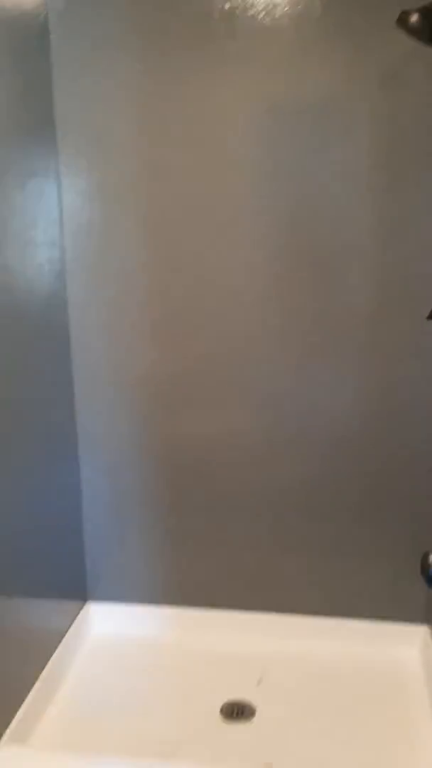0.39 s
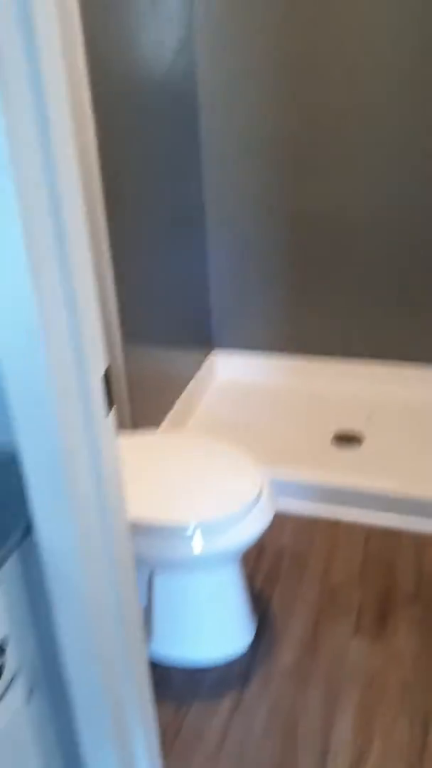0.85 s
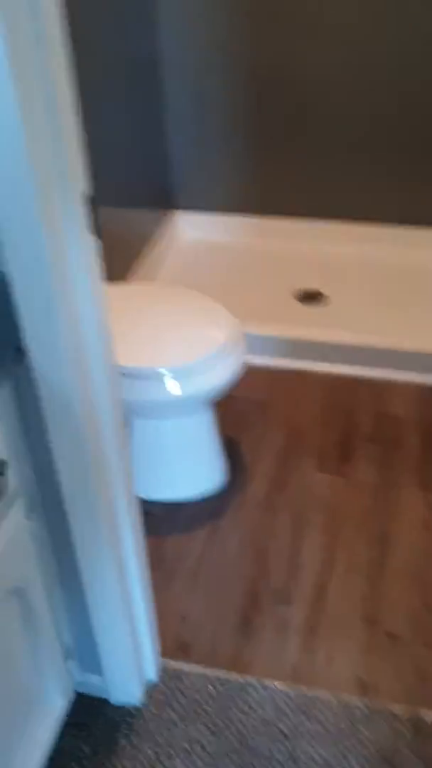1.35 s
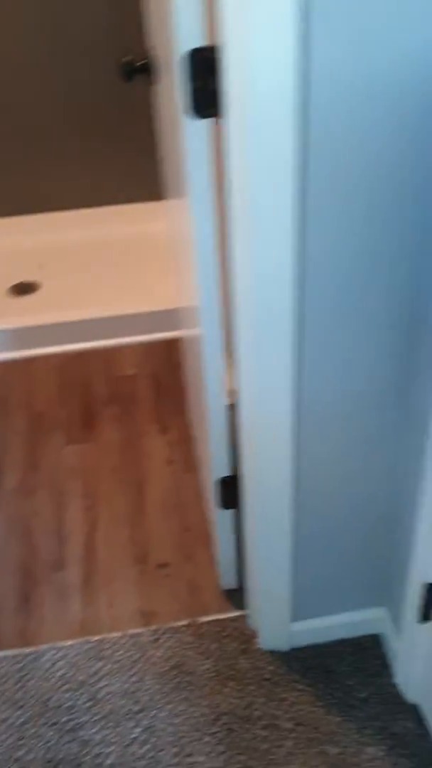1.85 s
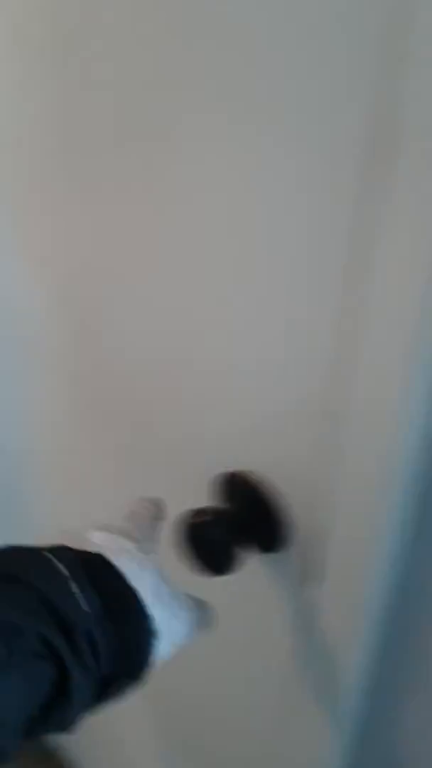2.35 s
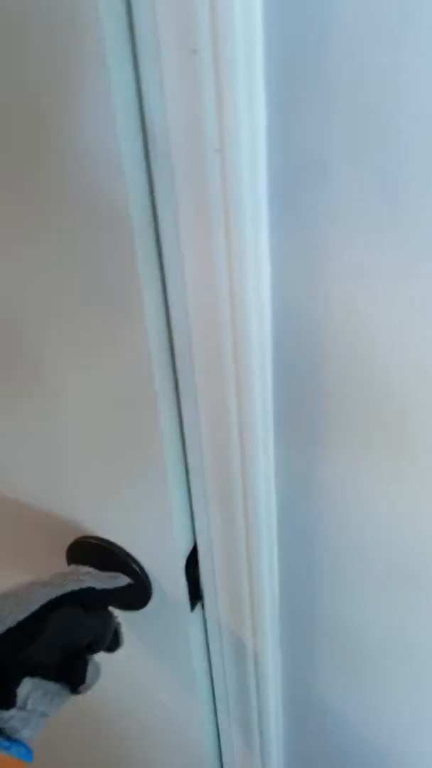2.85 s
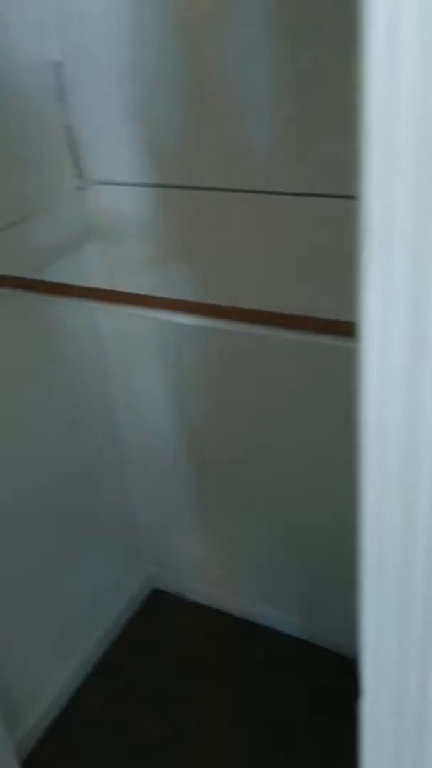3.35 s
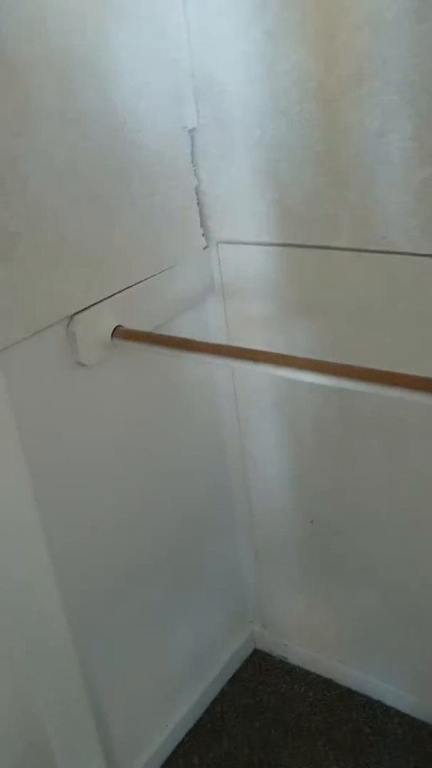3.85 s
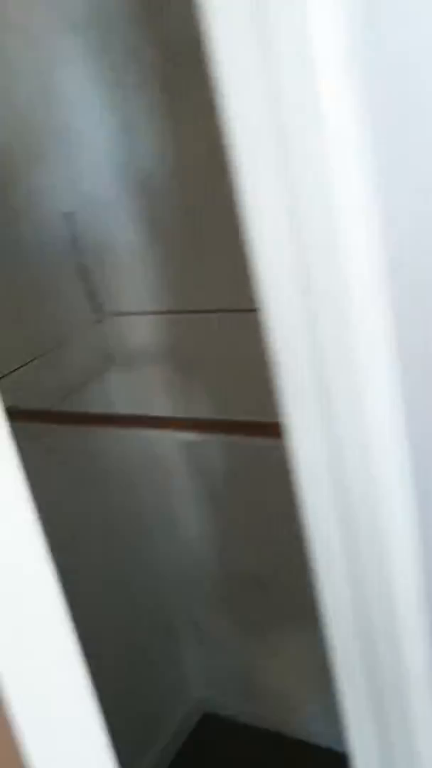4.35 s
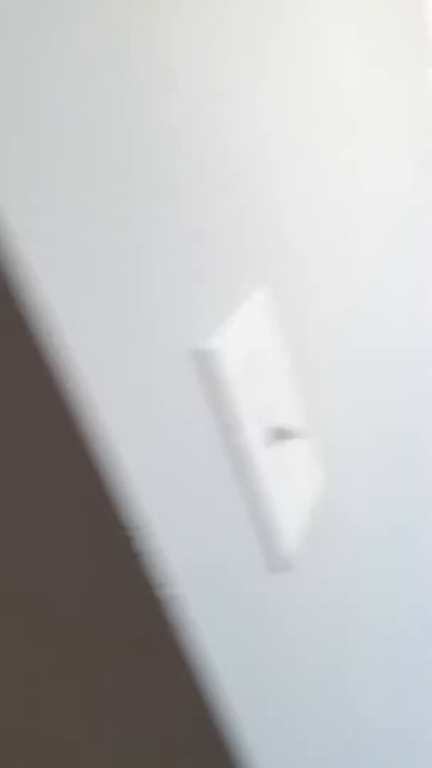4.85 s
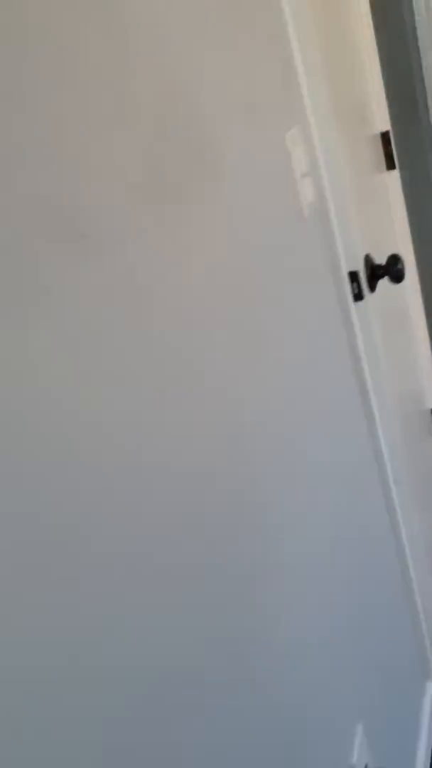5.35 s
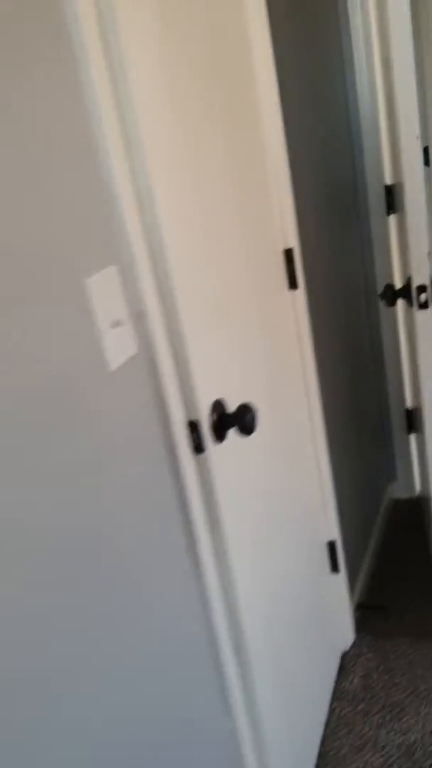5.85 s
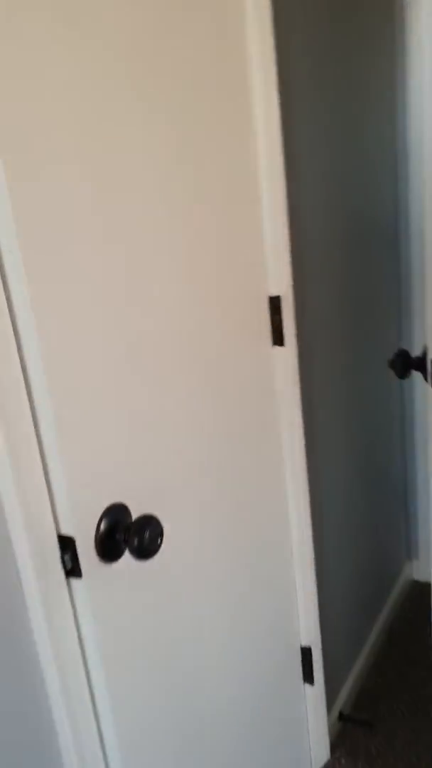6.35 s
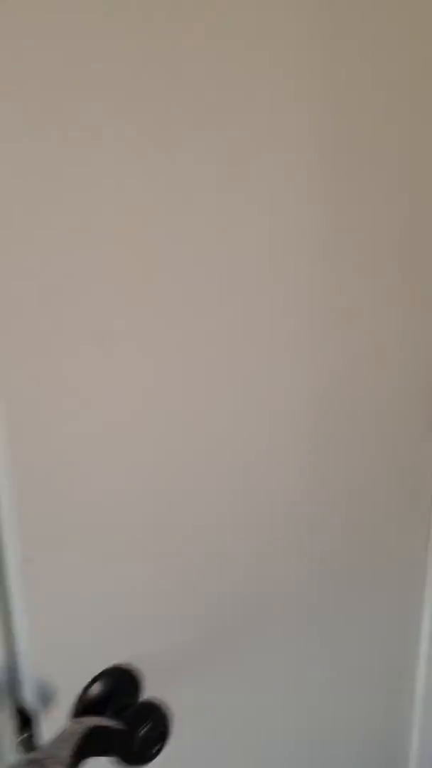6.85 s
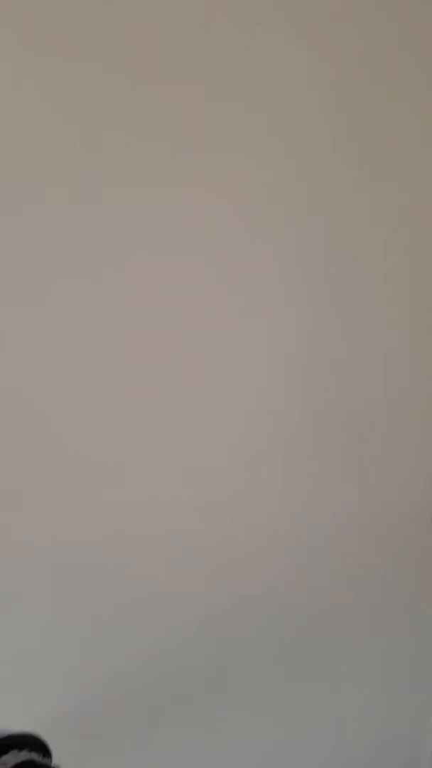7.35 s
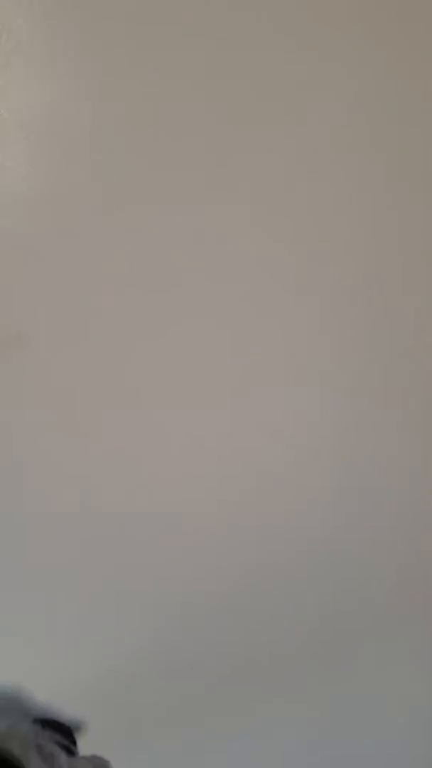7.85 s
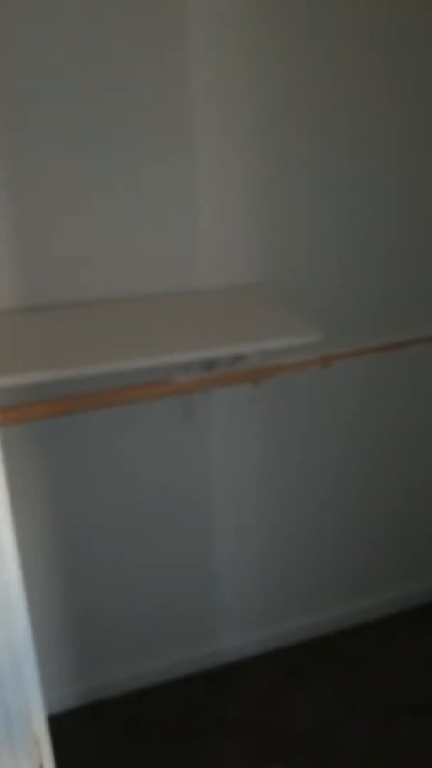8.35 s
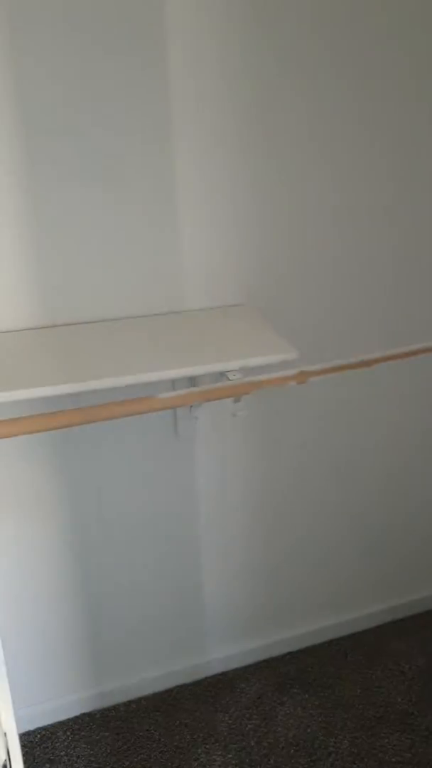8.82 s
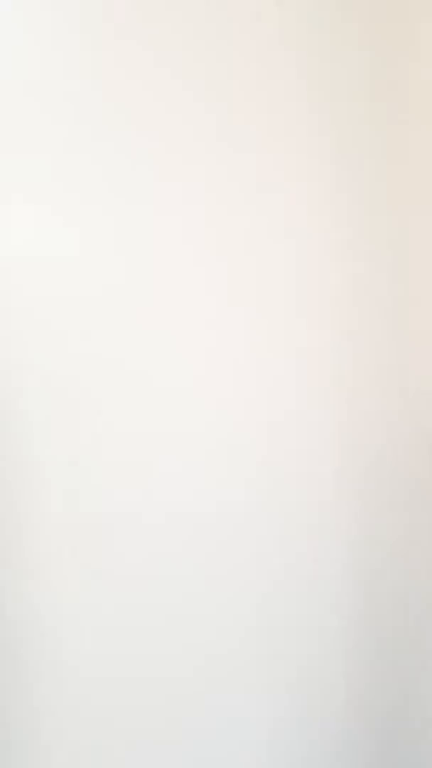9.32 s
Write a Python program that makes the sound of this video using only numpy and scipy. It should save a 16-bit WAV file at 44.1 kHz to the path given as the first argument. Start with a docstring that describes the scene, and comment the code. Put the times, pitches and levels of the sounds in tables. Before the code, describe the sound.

A jacket rustles close by, then door latches click and hollow doors thud and knock in an empty, carpeted house with bare walls.

```python
"""First a stiff jacket rustles close to a hand-held phone, over soft bumps and a faint hush; then
closet doors are opened and shut in an empty, carpeted house. Latches and knobs click (rattling
noise through metal bands), hollow leaves thud (struck modes) and knock (noise bands), bumps sag in
pitch, and hinges sing faintly (blurred tones). Bare walls add a short tail, and each blow stirs
a deep rumble."""
import sys
import numpy as np
from scipy import signal
from scipy.fft import rfft, irfft, next_fast_len
from scipy.io import wavfile
from scipy.ndimage import uniform_filter1d

SR = 44100
rng = np.random.default_rng(int(sys.argv[2]) if len(sys.argv) > 2 else 0)


def convert_level_to_amplitude(level_db):
    """Map a level in decibels to its linear amplitude factor."""
    exponent = np.asarray(level_db, float) / 20
    return 10 ** exponent


def wrap_up_sound(samples):
    """Save the sound to the file named by the first command line argument, as 16-bit audio."""
    columns = np.atleast_2d(samples).T
    # keep every value between -1 and 1, then stretch to whole-number steps
    tamed = np.clip(columns, -1, 1)
    steps = np.round(tamed * 32767).astype(np.int16)
    wavfile.write(sys.argv[1], SR, steps)


N = 417141
T = np.arange(N) / SR


def on_log(table, hz):
    """Read a (f/Hz, value) table on a log-frequency axis."""
    f, v = np.transpose(table)
    return np.interp(np.log(np.maximum(hz, 1)), np.log(f), v)


def unit(x):
    """Scale to rms 1."""
    return x / np.sqrt(np.mean(x ** 2))


def peak(x):
    """Scale to peak 1."""
    return x / np.abs(x).max()


def shaped(x, gain):
    """Filter by a gain given as a function of frequency."""
    n = next_fast_len(x.shape[-1])
    return irfft(rfft(x, n) * gain(np.arange(n // 2 + 1) * SR / n), n)[..., :x.shape[-1]]


def bell(hz, centre_hz, octaves):
    """Smooth band around a centre."""
    return np.exp(-.5 * (np.log2(np.maximum(hz, 1) / centre_hz) / octaves) ** 2)


def walk(rate):
    """Slow chance, spread 1, with a new target rate times a second."""
    k = int(SR / rate)
    steps = np.repeat(rng.standard_normal(N // k + 1), k)
    return unit(uniform_filter1d(uniform_filter1d(steps, k), k)[:N])


def swell(t0, t1, rise_db_s, fall_db_s):
    """Level in dB that climbs to 0 at t0, holds to t1 and falls away."""
    return -rise_db_s * np.maximum(t0 - T, 0) - fall_db_s * np.maximum(T - t1, 0)


def add(out, s, x):
    """Mix x in from time s."""
    i = int(s * SR)
    out[..., i:i + x.shape[-1]] += x[..., :N - i]


def sides(x, pan_db):
    """Spread one signal over both channels; pan_db is left minus right."""
    return x * convert_level_to_amplitude(np.array([pan_db, -pan_db]).reshape(2, -1) / 2)


# Latch, knob and strike plate, levels before walls and ports:
# t/s, peak level of the metal/dB, bright edge level/dB, wooden low part level/dB, ring f/Hz
LATCH_CLICKS = [(2.056, -37.5, -49, -60, 3070), (2.4955, -37, -41, -60, 4100),
                (2.5046, -10.5, -27, -14, 4230), (2.511, -14, -27.5, -34, 2380),
                (2.6638, -23.5, -37, -39, 2260), (2.7327, -6, -24, -35, 5500),
                (2.7415, -14, -25, -36.5, 3270), (2.8067, -9.5, -35, -41, 3400),
                (2.8135, -15.5, -27, -30.5, 2220), (3.1354, -40.5, -60, -59, 3080),
                (3.1555, -51, -42, -61, 3500), (3.2475, -29.5, -59, -49, 3440),
                (3.265, -23.5, -49, -51, 4280), (3.2915, -26, -61.5, -54, 5240),
                (4.551, -44, -67, -43.5, 1287), (4.7593, -21.5, -41.5, -35.5, 5050),
                (4.7665, -23.5, -50, -35, 2120), (4.9338, -16.5, -54, -11, 1500),
                (4.9412, -8.5, -25.5, -31.5, 2400), (4.9478, -9.5, -26, -34, 5500),
                (5.955, -48, -80, -82, 3080), (6.003, -45, -81, -81.5, 3190),
                (6.762, -67.5, -80.5, -58.5, 2010), (6.914, -39, -57, -64, 5500),
                (6.98, -49.5, -60, -62, 5000), (7.0943, -40.5, -50, -57.5, 2900),
                (7.1687, -42.5, -64, -59, 3260), (7.207, -45.5, -78, -70, 3180),
                (7.2783, -23, -46, -36.5, 3140), (7.3157, -29.5, -42, -34, 3330),
                (7.3601, -33, -38, -54, 2200), (7.3964, -31, -44, -62, 3280),
                (7.413, -30.5, -35.5, -61, 3500), (7.4245, -32.5, -34, -59, 4580),
                (7.5447, -39, -51, -55, 3630), (7.5528, -57, -67, -45, 1700),
                (7.7024, -28.5, -35.5, -41.5, 1800), (7.9089, -34.5, -63, -39, 3740),
                (7.9742, -15, -31, -39, 2600), (7.981, -25, -30.5, -38, 2500),
                (8.0137, -22, -31, -21, 5300), (8.019, -17, -61, -25.5, 2340), (8.757, -47, -69, -40, 1710)]
# Glove or foot scuffing, slow to start: columns as for the clicks
SCUFFS = [(1.211, -46, -55, -56, 2600), (1.232, -42.5, -53, -61.5, 3080), (6.235, -52, -75, -57, 1500),
          (2.706, -33.5, -42.5, -48, 5970), (3.157, -39, -55, -51.5, 2050),
          (3.268, -34.5, -65, -58.5, 3450), (3.393, -38, -45, -48.5, 3833),
          (4.821, -30.5, -28.5, -38.5, 4470), (7.942, -35.5, -37, -57, 4900),
          (6.1994, -53, -75.5, -48, 1930), (6.801, -42.5, -66, -44.5, 1900)]
# Resonances of the latch metal: f/Hz, width/Hz, level/dB
METAL_MODES = [(1900, 1000, 1.5), (2600, 590, -10.5), (4300, 880, -2), (7340, 1100, 2)]
# Harder contacts rattle longer; the more wood takes the blow, the sooner it stops (both in doublings)
LONGER_PER_DB, SHORTER_PER_WOOD_DB = 0.0556, 0.1957
LATCH_HZ, RING_PULL = 4200, 0.55  # the broad clack leans from the latch's own centre towards the ring pitch
RATTLE_TOP_HZ = 3500
SNAP_DB, SNAP_MS = -7, 0.5  # the first instant of a hard contact, against its peak


def contacts(table, rise_s, tick, rattle_ms):
    """Each contact is a tick and a rattle that ring metal, its bright edge and the wood around it."""
    out, t = np.zeros((2, N)), np.arange(8192) / SR
    for s, db, top_db, wood_db, ring_hz in table:
        extra_wood_db = np.clip(wood_db - db + 12.0, -4, 9)
        doublings = LONGER_PER_DB * (db + 25.5) - SHORTER_PER_WOOD_DB * extra_wood_db
        ms = max(rattle_ms * 2 ** doublings, 1)
        clack_hz = LATCH_HZ * (ring_hz / LATCH_HZ) ** RING_PULL

        def metal(hz):
            modes = sum(convert_level_to_amplitude(d) / (1 + (2 * (hz - f) / w) ** 2) for f, w, d in METAL_MODES)
            return bell(hz, clack_hz, 1.0) * (0.14 + modes + 1.1 * bell(hz, ring_hz, 0.24))

        # parts of the latch lie apart, so the ports differ
        shared, left, right = rng.standard_normal((3, len(t)))
        noise = shared + np.array([left, right])
        rise, rattle = np.minimum(t / rise_s, 1), np.exp(-t * 1000 / ms)

        # the treble dies with the tick
        bright = shaped(noise, metal) * (tick * np.exp(-t / 0.009) + 0.2 * rattle ** 2)
        dull = shaped(noise, lambda hz: metal(hz) / np.hypot(1, hz / RATTLE_TOP_HZ)) * rattle
        x = convert_level_to_amplitude(db) * peak((bright + dull) * rise)

        snap = shaped(noise, lambda hz: bell(hz, ring_hz, 1.5)) * np.exp(-t * 1000 / SNAP_MS)
        x += convert_level_to_amplitude(db + SNAP_DB) * (tick > 0) * peak(snap)

        edge = unit(shaped(noise, lambda hz: bell(hz, 14000, 0.7)))
        fall = (rattle + tick * np.exp(-t / 0.0026)) * rise
        x += convert_level_to_amplitude(top_db) * edge * fall * rattle ** 0.35

        # wood rings on longer
        wood = unit(shaped(noise, lambda hz: bell(hz, 540, 1.0) + 0.34 * bell(hz, 800, 0.04)))
        x += convert_level_to_amplitude(wood_db) * wood * rattle ** 0.39 * rise
        add(out, s, x)
    return out


# Door leaf struck: t/s, peak level/dB before walls and ports, contact length/ms
THUDS = [(2.507, -14.5, 0.68), (2.546, -17, 0.84), (2.716, -22.5, 2.8), (2.812, -24.5, 1.1),
         (2.985, -33, 0.37), (3.263, -38.5, 0.62), (4.767, -30, 0.85), (4.933, -11, 2.6), (4.945, -12, 1.7),
         (4.959, -12.5, 2.0), (7.127, -44.5, 0.47), (7.285, -26, 0.32), (7.322, -23.5, 3.4),
         (7.367, -22, 3.9), (7.554, -33.5, 0.59), (7.66, -34, 0.68), (7.907, -28, 3.8), (7.965, -15.5, 2.9),
         (8.019, -12.5, 1.65), (8.07, -24.5, 2.1), (8.753, -44, 0.73)]
# Modes of the hollow leaf, before scatter: f/Hz, level/dB, t60/s before LEAF_DAMPING
LEAF_MODES = [(152, -4, 0.48), (222.3, -1, 0.56), (268, -3.5, 0.44), (314.6, -1.5, 0.22), (376, -9, 0.79),
              (433, -7, 0.66), (597, -17.5, 0.6), (596, -31.5, 0.46), (780, -22, 0.4), (980, -20.5, 0.27)]
LEAF_DAMPING = 0.77  # share of the listed t60
FRAME_DB, FRAME_MS = -7.5, 23  # the frame soaks up most of a blow at once; the rest rings on at this level


def thuds():
    """A half-sine push and its chatter in the frame ring the leaf; skins and frame split each mode."""
    out, t = np.zeros(N), np.arange(SR // 2) / SR
    modes = LEAF_MODES * 8
    for s, db, ms in THUDS:
        ring = 0
        for (f, d, t60), (a, b) in zip(modes, rng.standard_normal((len(modes), 2))):
            tone = np.sin(2 * np.pi * f * np.exp(.06 * b) * t)
            ring = ring + convert_level_to_amplitude(d + 2.0 * a) * tone * 1000 ** (-t / (LEAF_DAMPING * t60))
        ring = ring * (convert_level_to_amplitude(FRAME_DB) + np.exp(-t * 1000 / FRAME_MS))
        chatter = 0.053 * rng.standard_normal(4096) * np.exp(-t[:4096] / 0.05)
        chatter[0] = 1  # the blow itself
        half_sine = np.sin(np.linspace(0, np.pi, max(int(ms * SR / 1000), 3)))
        push = np.convolve(chatter, half_sine)
        add(out, s, convert_level_to_amplitude(db) * peak(signal.fftconvolve(ring, push)))
    return sides(out, 0)


# Knob and bolt knocking the hollow skin: t/s, level/dB before rise and decay, f/Hz, decay/ms
KNOCKS = [(2.506, -28, 735, 39), (2.72, -48, 600, 16), (4.7585, -29, 820, 28), (4.826, -48, 800, 22),
          (4.549, -49, 1500, 4.6), (4.937, -19, 620, 17), (4.949, -33.5, 2000, 83), (6.81, -53, 900, 32),
          (7.279, -38, 610, 15), (7.5525, -39, 610, 24), (7.625, -51, 733, 40), (7.888, -43.5, 784, 33),
          (8.015, -35.5, 530, 70), (8.758, -50, 1454, 44), (3.55, -64, 300, 220), (6.2, -59.5, 700, 54),
          (8.045, -33, 394, 77)]


def knocks():
    """Many close skin modes ring together as a rough band."""
    out, t_ms = np.zeros((2, N)), np.arange(SR // 4) / SR * 1000
    for s, db, hz, ms in KNOCKS:
        shared, left, right = rng.standard_normal((3, len(t_ms)))
        noise = shared + 0.94 * np.array([left, right])
        ring = unit(shaped(noise, lambda f: bell(f, hz, 0.29)))
        rise = np.minimum(t_ms / 1.7, 1)
        add(out, s, convert_level_to_amplitude(db) * ring * rise * np.exp(-t_ms / ms))
    return out


# Soft bumps in leaf, floor and hand: t/s, peak level/dB before walls and ports, starting f/Hz
BUMPS = [(0.06, -53, 89), (0.405, -49, 151), (1.955, -46, 62.84), (2.005, -43, 67), (2.053, -45, 58.5),
         (2.747, -31, 45.73), (2.979, -40.5, 41.03), (3.639, -54, 59), (3.828, -44.5, 73.2),
         (3.867, -41.5, 52.65), (3.97, -43.5, 45.5), (4.792, -32.5, 56), (4.897, -32.5, 57.75),
         (5.033, -31, 55.9), (6.231, -46.5, 129), (6.275, -49.5, 96), (6.808, -40.5, 73.7),
         (6.852, -34.5, 52.5), (6.933, -36.5, 55.45), (7.071, -35.5, 65.3), (7.17, -43, 71),
         (7.361, -21, 81), (7.376, -23, 74.3), (7.447, -34.5, 62.1), (7.958, -10.5, 87.3),
         (7.989, -11, 75.3), (8.059, -9.5, 84.6), (8.129, -15.5, 81), (8.199, -24.5, 64.5),
         (8.269, -30.5, 63.7), (8.337, -28, 56.1), (8.486, -26.5, 103), (8.583, -25, 75.5),
         (8.628, -24, 60.9), (8.668, -26, 100.8), (8.752, -24, 70.5), (8.86, -34.5, 55.6),
         (8.926, -34, 69.9), (9.007, -35.5, 66.3), (9.297, -36, 48.6)]


def bumps():
    """A few soft, lopsided cycles that sag in pitch."""
    out, t = np.zeros(N), np.arange(SR // 2) / SR
    for s, db, hz in BUMPS:
        cycles = hz * t * (1 - 0.13 * t)
        x = np.sin(2 * np.pi * cycles) + 0.16 * np.sin(2 * np.pi * 2.3 * cycles)
        x *= (1 - np.exp(-t / 0.0031)) * np.exp(-hz * t / 1.38)
        add(out, s, convert_level_to_amplitude(db) * peak(x))
    return sides(out, 0)


# Decay of the bare-walled room: f/Hz, t60/s
ROOM_DECAY = [(60, 1), (150, 0.29), (400, 0.44), (1000, 0.56), (3000, 0.36), (8000, 0.43), (14000, 0.09)]
ROOM_DB, ROOM_LIKENESS_HZ = -7.5, 330  # echo energy against the direct sound; ports alike below this


def room(x):
    """Dense echoes fade by band, bass alike at both ports; the phone moves, so four patterns take turns."""
    t, out, places = np.arange(SR) / SR, 0, 4
    place = (T / .07).astype(int) % places
    for k in range(places):
        mid, side = rng.standard_normal((2, SR))
        side = shaped(side, lambda hz: hz / np.hypot(hz, ROOM_LIKENESS_HZ))
        noise, echo = mid + np.outer([1, -1], side), 0
        for f in 45 * 2. ** np.arange(9):
            t60 = on_log(ROOM_DECAY, f)
            band = shaped(noise, lambda hz: bell(hz, f, 0.38))
            echo = echo + band * 1000 ** (-t / t60) / np.sqrt(t60)
        echo *= np.minimum(t / 0.0013, 1)
        echo *= convert_level_to_amplitude(ROOM_DB) / np.sqrt(np.sum(echo ** 2) / 2)
        share = uniform_filter1d(1. * (place == k), 512)  # short crossfades between patterns
        out = out + signal.fftconvolve((x.mean(0) * share)[None], echo, axes=1)[:, :N]
    return out


# Steady sway of the cloth as the holder walks and turns: t/s, level/dB before the band levels,
# crispness/dB (treble against the middle), left minus right/dB (its median is taken off)
SWAY = [(0, -72, 3.5, -5.5), (.5, -62.5, -1, -9.5), (1.149, -69, 1.5, -9), (1.55, -60, -7, -9),
        (1.93, -65.5, -2.5, -5), (2.2, -57, -2, -9.5), (3.2, -60.5, -12.5, -5.5), (3.6, -76.5, 5, -8.5),
        (3.8, -93.5, 3, -10), (4.1, -84.5, 6.5, -8.5), (4.299, -64, -5, -8.5), (4.74, -63.5, -11, -4.5),
        (4.9, -53, -11, -10.5), (5.449, -63.5, -6.5, -9), (5.7, -67.5, -3.5, -7.5), (6.101, -62.5, -10, -7),
        (6.601, -63.5, -7, -12), (6.779, -70, -9, -9.5), (7.201, -68, 0, -10.5), (7.75, -53, -17.5, -4),
        (8.2, -55, -11, -14), (8.65, -65, 1.5, -17.5), (8.92, -83.5, -9, -6), (9.02, -61.5, 3, -19.5),
        (9.46, -59, -8.5, -9.5)]
# Sleeve rubbing the jacket: t/s at full level, length/s, level/dB before the band levels, crispness/dB
RUBS = [(0.231, 0.17, -57.5, 0), (0.596, 0.069, -59, -2.5), (0.766, 0.088, -57, -4.5),
        (0.883, 0.072, -55.5, -2), (0.982, 0.054, -59, -1.5), (1.361, 0.026, -58.5, 1.5),
        (2.03, 0.1, -52.5, -7.5), (2.264, 0.087, -54.5, -5), (3.25, 0.078, -52, -9),
        (3.406, 0.018, -55, -16), (4.385, 0.19, -61.5, -11), (6.222, 0.018, -59.5, -31),
        (6.825, 0.1, -58, -9.5), (7.324, 0.1, -49, -11), (7.602, 0.06, -52.5, -22), (7.917, 0.13, -49, -29),
        (8.246, 0.28, -51.5, 0), (8.374, 0.052, -57, 7.5), (8.748, 0.21, -74.5, -54), (9.066, 0.21, -55, 2)]
# Colour of the cloth noise: f/Hz, relative level/dB
CLOTH_COLOUR = [(120, -34), (200, 1.5), (289, 1), (485, -4), (584, -6.5), (3700, -15), (5350, -17.5),
                (7460, -13), (13500, -10.5), (15600, -16), (16500, -34.5)]
# Cloth at the two microphone ports: f/Hz, left minus right/dB
CLOTH_PORTS = [(60, -2.0), (110, -13.5), (200, -1.5), (380, -4), (700, -1.5), (1290, -8), (2380, -8),
               (4400, -4.5), (8120, -2), (15000, 23)]
RUB_RISE_DB_S, RUB_FALL_DB_S = 334, 144.5
# f/Hz, width/octaves, level/dB, dB per dB of crispness; the low part grows as the rub gets duller
CLOTH_BANDS = ((600, 0.7, -4.5, -0.35), (2600, 0.98, 0.3, 0.1), (6340, 1.0, -3.0, 0.99), (12900, 0.92, -0.4, 0.97))


def jacket():
    """Fabric rubbing, close by: bands flicker on their own, with crackle as fibres slip."""
    s, *columns = np.transpose(SWAY)
    sway_db, sway_crisp_db, pan_db = (np.interp(T, s, c) for c in columns)
    moves = [(sway_db, sway_crisp_db)]
    for start, length, db, crisp_db in RUBS:
        moves.append((db + swell(start, start + length, RUB_RISE_DB_S, RUB_FALL_DB_S), crisp_db))

    slips = convert_level_to_amplitude(1.1 * rng.exponential(size=N // 40 + 1).repeat(40)[:N])
    size = next_fast_len(N)
    source = rfft(rng.standard_normal((2, N)) * slips, size)
    hz = np.arange(source.shape[1]) * SR / size
    colour = convert_level_to_amplitude(on_log(CLOTH_COLOUR, hz) + np.outer([.5, -.5], on_log(CLOTH_PORTS, hz)))
    out = 0
    for centre_hz, octaves, band_db, tilt in CLOTH_BANDS:
        band = unit(irfft(source * colour * bell(hz, centre_hz, octaves))[:, :N])
        level = np.sqrt(sum(convert_level_to_amplitude(db + tilt * crisp_db) ** 2 for db, crisp_db in moves))
        out = out + band * level * convert_level_to_amplitude(band_db + 1.4 * walk(15))
    return sides(out, pan_db - np.median(pan_db))


# Hinges singing while a leaf swings: start t/s, end t/s, start f/Hz, end f/Hz, level/dB
HINGES = [(2.997, 3.5, 710, 724, -64.5), (3.2, 3.857, 210, 189.7, -64.5), (5.15, 5.502, 587, 502, -67),
          (5.397, 5.859, 503, 470, -64), (5.804, 6.201, 484, 600, -67), (5.829, 6.251, 1066, 1073, -71),
          (5.947, 6.305, 1190, 1220, -71.5), (6.053, 6.498, 1280, 1245, -70), (7.6, 7.945, 832, 789, -60),
          (7.813, 7.968, 1683, 1686, -51.5), (8.036, 8.154, 1670, 1690, -57), (8.681, 8.907, 459, 467, -59),
          (8.771, 9.001, 940, 930, -66), (9.075, 9.45, 490, 496, -57.5)]
BLUR_HZ, BLUR_SHARE, CLEAR_DB = 41.4, 0.33, -87  # tones louder than CLEAR_DB lock and narrow


def hinges():
    """Faint friction tones, blurred by noise, that glide slowly."""
    out = np.zeros(N)
    for t0, t1, start_hz, end_hz, db in HINGES:
        width_hz = BLUR_HZ + BLUR_SHARE * start_hz * min(convert_level_to_amplitude(CLEAR_DB - db), 1)
        t = np.arange(int((t1 - t0) * SR)) / SR
        a, b = shaped(rng.standard_normal((2, len(t))), lambda hz: 1 / (1 + (2 * hz / width_hz) ** 2))
        phase = 2 * np.pi * np.cumsum(np.linspace(start_hz, end_hz, len(t))) / SR
        tone = unit((unit(a) + 0.31) * np.cos(phase) + unit(b) * np.sin(phase))
        fade = np.sin(np.pi * t / (t1 - t0)) ** 0.15
        add(out, t0, convert_level_to_amplitude(db) * fade * tone)
    return sides(out, -2.7)


# Colour of the deep noise, cut off at 350 Hz: f/Hz, relative level/dB
DEEP_COLOUR = [(12, -42), (20, -10.5), (32, 0), (53, -0.5), (130, -10.5), (318, -22.5), (350, -13),
               (460, -43), (770, -120)]
# Steady level, then the levels against the thud or bump that stirs it
RUMBLE_DB, AFTER_THUD_DB, AFTER_BUMP_DB = -68.5, -24.5, -21.5
RUMBLE_LATE_S, RUMBLE_RISE_DB_S, RUMBLE_FALL_DB_S = 0.069, 206.5, 69


def rumble():
    """Floor and leaf rumble on after each blow: deep, lumpy noise, nearly alike in both channels."""
    noise = rng.standard_normal((2, N))
    mid, side = shaped(noise, lambda hz: convert_level_to_amplitude(on_log(DEEP_COLOUR, hz)) * (hz < 350))
    both = unit(mid) + .4 * np.outer([1, -1], unit(side))
    blows = [(s, db + AFTER_THUD_DB) for s, db, _ in THUDS]
    blows += [(s, db + AFTER_BUMP_DB) for s, db, _ in BUMPS]
    power = convert_level_to_amplitude(RUMBLE_DB) ** 2
    for s, db in blows:
        late = s + RUMBLE_LATE_S
        power = power + convert_level_to_amplitude(db + swell(late, late, RUMBLE_RISE_DB_S, RUMBLE_FALL_DB_S)) ** 2
    return both * np.sqrt(power) * convert_level_to_amplitude(2.0 * walk(13))


# Colour of the background noise: f/Hz, relative level/dB
HUSH_COLOUR = [(120, -32), (200, -4), (594, -8.5), (8970, -31.5), (14500, -19.5), (16500, -47)]


def hush():
    """The still house and the microphone's own noise: steady coloured noise."""
    noise = rng.standard_normal((2, N))
    return convert_level_to_amplitude(-76.5) * unit(shaped(noise, lambda hz: convert_level_to_amplitude(on_log(HUSH_COLOUR, hz))))


# Doors and bumps at the two microphone ports: f/Hz, left minus right/dB
PORTS = [(60, 6.5), (110, -5), (200, -1.5), (380, -3), (700, -5.5), (1290, 1), (2380, -9), (4400, -6),
         (8120, 4.5), (15000, 16)]
PORT_LAG_MS = 0.17  # left after right


def scene():
    """Doors heard directly and off the walls, through two ports of unlike colour; cloth and rumble are close."""
    doors = contacts(LATCH_CLICKS, 0.000081, 0.6, 5.42) + contacts(SCUFFS, 0.0073, 0, 44)
    doors = doors + thuds() + knocks()
    near = bumps()
    heard = doors + near + room(doors + 1.4 * near)  # bumps come partly through the hand
    way = np.array([[.5], [-.5]])

    def port(hz):
        lag = np.exp(-2j * np.pi * hz * way * PORT_LAG_MS / 1000)
        return convert_level_to_amplitude(way * on_log(PORTS, hz)) * lag

    return shaped(heard, port) + hinges() + jacket() + rumble() + hush()


def roll_off(x):
    """The treble ends steeply here."""
    return signal.sosfilt(signal.butter(12, 16960, fs=SR, output="sos"), x)


def record(dry):
    """The phone trims the deepest bass, clips at full scale and cuts the top."""
    bass_cut = signal.butter(2, 34, "high", fs=SR, output="sos")
    top_cut = signal.ellip(8, .3, 70, 15750, fs=SR, output="sos")
    clipped = np.clip(signal.sosfilt(bass_cut, dry), -1, 1)
    mix = signal.sosfilt(top_cut, clipped)
    return roll_off(mix)


dry = scene()
out = record(dry)
wrap_up_sound(out)
```